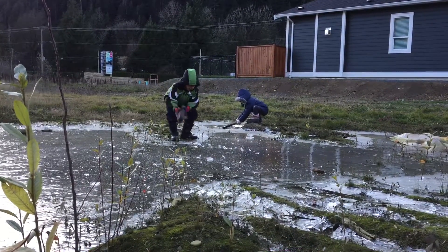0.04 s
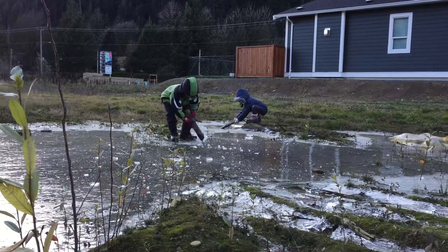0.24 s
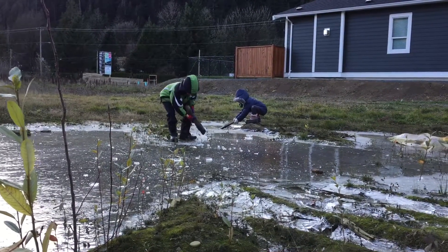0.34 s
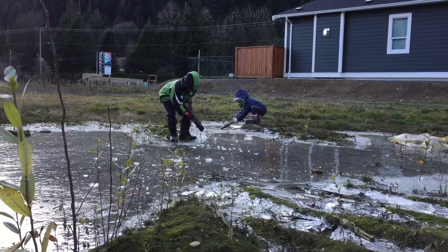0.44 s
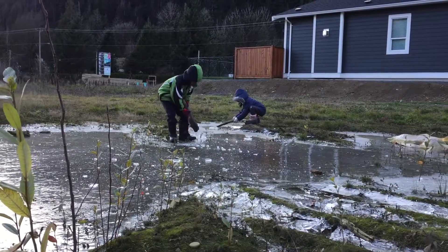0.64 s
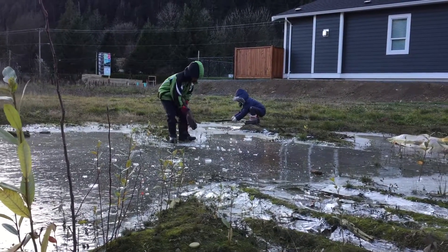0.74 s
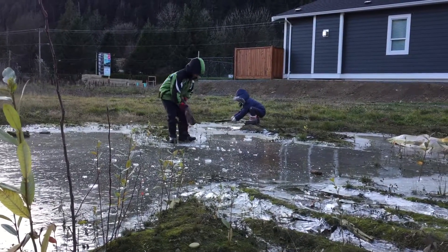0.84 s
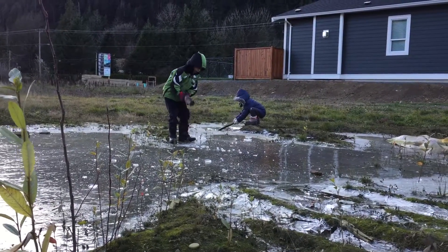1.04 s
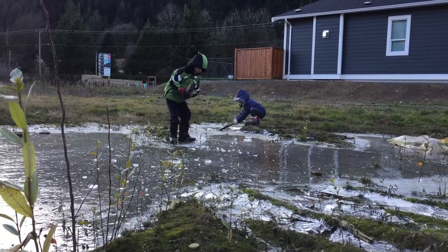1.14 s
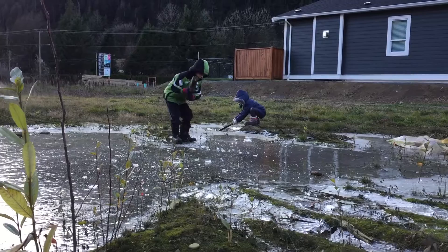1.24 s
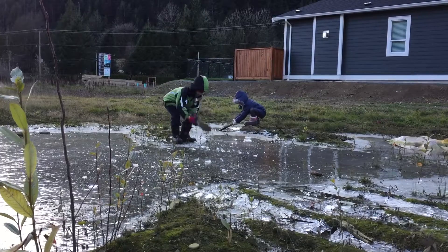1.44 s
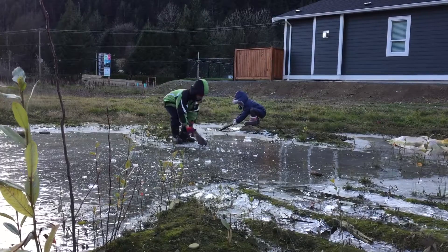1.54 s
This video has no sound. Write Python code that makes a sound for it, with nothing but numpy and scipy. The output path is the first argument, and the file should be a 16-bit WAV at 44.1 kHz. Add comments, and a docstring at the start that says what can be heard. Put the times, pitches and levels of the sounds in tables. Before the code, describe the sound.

A sharp crash of ice on a frozen puddle, then shards skid, clink and crack.

```python
"""A sharp crash of ice some metres away: a child smashes a slab on a frozen puddle in an open field.
The sheet cracks in runs of tiny fractures, rings and slaps the water. Splinters tick and skid,
loose plates clink and smaller cracks follow, with dull echoes from ground, house and trees.
Wind nudges the microphone; a far machine hums under the quiet air."""
import sys
import numpy as np
from scipy import signal
from scipy.fft import rfft, irfft
from scipy.io import wavfile

SR = 44100
rng = np.random.default_rng(int(sys.argv[2]) if len(sys.argv) > 2 else 0)


def unload_wav(signal):
    """Save mono or channel-first audio to the path in sys.argv[1] as 16-bit WAV at rate SR, clipped to [-1, 1]."""
    wavfile.write(
        sys.argv[1],
        SR,
        np.round(np.clip(np.atleast_2d(signal).T, -1, 1) * 32767).astype(np.int16),
    )


N = 70560
T = np.arange(N) / SR
BLOW_S = .2364


def blow(slap_lag_s=.0021):
    """The slab hits the sheet, which rings briefly and slaps the water."""
    # modes of the struck sheet: (frequency [Hz], level [dB], t60 [s])
    sheet_modes = [(1180, -4, .016), (1580, -6, .014), (1878, -7, .022), (2520, -17, .017),
                   (3230, -20, .026), (4460, -26, .026), (8780, -29, .024)]
    # modes of the sheet bending on the water: (frequency [Hz], level [dB], t60 [s])
    slap_modes = [(152, -23, .06), (250, -23, .025), (560, -13.5, .026), (909, -20, .038)]
    sheet = body(click(BLOW_S, db=1.4), sheet_modes)
    slap = body(click(BLOW_S + slap_lag_s, db=1.5), slap_modes)
    return filtered(sheet + slap, 140, "high", order=3)  # a thin sheet radiates little bass


def cracks():
    """Each crack is a brief run of tiny fractures; large pieces thud, small ones snap and splinter."""
    # cracks and crunches: (time [s], rise [s], decay [s], thud [dB], snap [dB], splinter [dB],
    # thud [Hz], snap [Hz], splinter [Hz])
    bursts = [(0.2227, 0.006, 0.0094, -39, -30, -37.5, 1010, 2000, 5150),
              (.2350, 0.0023, .0015, -12.5, -14.5, -19, 1160, 1760, 4800),
              (0.2377, .0005, 0.0025, -24, -19.5, -25.5, 590, 2340, 8800),
              (.2490, 0.0015, 0.0038, -28.5, -54, -35.5, 976, 2000, 4950),
              (0.2923, 0.0025, 0.0034, -42, -66.5, -53.5, 890, 1910, 5740),
              (0.339, 0.0055, 0.0061, -35.5, -37.5, -50, 590, 1420, 7400),
              (0.4244, 0.00076, 0.0017, -38.5, -42, -48, 1100, 1920, 5500),
              (.440, 0.0025, .006, -42.5, -49, -67, 1100, 1640, 4000),
              (0.4579, 0.00082, 0.0025, -45.5, -42, -58, 1100, 1880, 3800),
              (0.544, 0.0011, 0.0038, -58, -43.5, -72, 1100, 1780, 4000),
              (.552, .002, 0.0024, -52, -51.5, -70, 1100, 1850, 3950),
              (.6062, 0.00063, .003, -52.5, -48, -83, 1100, 1820, 4030),
              (.688, 0.0015, 0.0048, -39.5, -43, -58.5, 1200, 2670, 8440),
              (0.7518, 0.0027, 0.0031, -47, -43.5, -48, 1100, 2400, 4070),
              (0.797, 0.0019, 0.0054, -44.5, -41.5, -50, 1220, 1880, 5950),
              (0.8216, 0.00068, 0.0046, -29.5, -27.5, -39, 950, 2530, 6940),
              (.838, 0.0018, 0.0057, -36.5, -39.5, -53, 1250, 2370, 4500),
              (0.9216, .001, 0.0038, -48.5, -54.5, -64.5, 1100, 1900, 6150),
              (1.052, 0.0035, 0.0071, -38, -41, -75, 660, 1970, 4030),
              (1.0753, 0.0012, 0.015, -46.5, -57.5, -60, 1100, 2000, 3990),
              (1.093, 0.0084, 0.0014, -35.5, -34, -39, 472.2, 1600, 6440),
              (1.1149, .002, 0.0066, -54, -52, -62, 1100, 2400, 6240),
              (1.592, 0.0029, .008, -33.5, -28.5, -33.5, 1300, 2550, 5500)]
    out = np.zeros(N)
    for s, rise_s, decay_s, thud_db, snap_db, splinter_db, thud_hz, snap_hz, splinter_hz in bursts:
        envelope = np.clip((T - s) / rise_s, 0, 1) * np.exp(-np.maximum(T - s - rise_s, 0) / decay_s)
        large, medium, small = [envelope * grains(per_s=7100, spread_db=2.5) for _ in range(3)]
        thud = filtered(resonant(large, thud_hz, width=1.45), (180, 2500), "band")
        snap = filtered(resonant(medium, snap_hz, width=1.168), (820, 3800), "band")
        splinter = filtered(resonant(small, splinter_hz, width=1.14), 3100, "high")
        for band, db in ((thud, thud_db), (snap, snap_db), (splinter, splinter_db)):
            out += from_db(db) * match_energy(band, envelope)
    return out


def clinks():
    """Knocked loose plates ring like dull glass."""
    # knocks on a plate: (time [s], level [dB], pitch [ratio])
    knocks = [(0.6888, -35, 0.98), (0.6982, -44, 0.98), (0.7037, -44, 0.98), (0.8042, -42.5, 0.91)]
    # plate modes: (frequency [Hz], level [dB], t60 [s])
    plate_modes = [(1211, -6, .04), (1420, -6, .035), (1990, -6, .035), (2428, -5, .04), (2960, 0, .044),
                   (4540, -7, .034), (8100, -14, .03)]
    out = np.zeros(N)
    for s, db, pitch in knocks:
        for k, (hz, mode_db, t60_s) in enumerate(plate_modes):
            out += (-1) ** k * ring(click(s, db + mode_db), hz * pitch, t60_s)
    return out


def splinter_ticks(contact_s=.00094, scuff_max_hz=10000):
    """Each splinter lands with a brief scuff and its own bright ring."""
    # splinter landings: (time [s], level [dB], ring [Hz])
    landings = [(.2915, -51, 12000), (.3170, -37.5, 6800), (0.32, -54, 11400), (0.3453, -37.5, 15000),
                (0.3634, -41, 10000), (0.3716, -44, 7240), (0.3886, -44.5, 13600), (.453, -56, 9200),
                (0.4994, -54.5, 11000), (0.5142, -47, 7800), (.5224, -42.5, 6740), (.559, -58, 14800),
                (0.8, -51, 15000), (0.8236, -45, 12900), (0.9367, -54, 7000)]
    out = np.zeros(N)
    for s, db, hz in landings:
        contact = (T >= s) * np.exp(-np.abs(T - s) / contact_s)
        scuff = resonant(contact * rng.standard_normal(N), min(hz, scuff_max_hz), width=3.3)
        out += from_db(db) * match_energy(scuff, contact)
        out += ring(click(s, db - 6), hz, t60_s=.012)
    return filtered(out, 2440, "high")


def spray(db=-56, chips_per_s=6000, decay_s=.14):
    """Fine chips and droplets patter down after the blow, fading away."""
    envelope = (T > BLOW_S) * np.exp(-np.abs(T - BLOW_S) / decay_s)
    pitches_hz = np.geomspace(3670, 15000, 16)
    patter = np.zeros(N)
    for hz in pitches_hz:
        impacts = grains(chips_per_s / len(pitches_hz), spread_db=.5)
        patter += resonant(impacts, hz, width=1.1) / np.sqrt(hz)
    return from_db(db) * envelope * rms_one(patter)


def skid(contacts_per_s=2500, band_hz=(780, 6300)):
    """Small pieces rustle and ring faintly as they slide over the sheet."""
    # modes of the sliding pieces: (frequency [Hz], level [dB], t60 [s])
    piece_modes = [(1100, -1.5, 0.015), (1550, -4.5, 0.02), (1876, -0.5, 0.014), (1940, -1, 0.021),
                   (2240, -4.5, 0.014), (3400, -7.5, .005)]
    # skid envelope: (time [s], level [dB])
    levels = [(0, -48.5), (.05, -63.5), (.12, -54), (.2, -67), (.4, -57.5), (.65, -61), (.9, -59.5),
              (1.15, -77), (1.6, -73)]
    chatter = np.zeros(N)
    for hz, db, t60_s in piece_modes:
        contacts = grains(contacts_per_s / len(piece_modes), spread_db=2)
        chatter += from_db(db) * ring(contacts, hz, t60_s)
    envelope = from_db(np.interp(T, *np.transpose(levels)))
    return envelope * rms_one(filtered(chatter, band_hz, "band"))


def scatter(x, db, t60_s, top_hz, onset_s=.004):
    """A dull, dying cloud of reflections."""
    tail = rng.standard_normal(N) * from_db(-60 * T / t60_s) * (1 - np.exp(-T / onset_s))
    echoes = signal.fftconvolve(x, tail / np.linalg.norm(tail))[:N]
    return from_db(db) * filtered(echoes, top_hz, "low", order=1)


def wind(width=1.57):
    """Short low lumps of air pressure on the microphone."""
    # wind buffets: (peak time [s], level [dB], Gaussian sigma [s], band centre [Hz])
    buffets = [(0.52, -47.5, 0.15, 66.7), (0.665, -48.5, 0.041, 97.5), (0.75, -38.5, 0.027, 65),
               (0.863, -47.5, 0.052, 76.6), (0.969, -35.5, 0.011, 55.3), (1.053, -45.5, 0.052, 74.8),
               (1.227, -34.5, 0.0092, 80), (1.43, -37, 0.0072, 135), (1.493, -38, 0.014, 70),
               (1.519, -32.5, 0.012, 134.5), (1.537, -42, 0.041, 75)]
    out = np.zeros(N)
    for s, db, sigma_s, hz in buffets:
        envelope = np.exp(-.5 * ((T - s) / sigma_s) ** 2)
        rumble = filtered(rng.standard_normal(N), (hz / width, hz * width), "band", order=3)
        out += from_db(db) * match_energy(rumble * envelope, envelope)
    return out


def machine_hum(wander_hz=3):
    """Two tones of a far machine waver in level and pitch."""
    # machine tones: (frequency [Hz], level [dB])
    tones = [(242.2, -56.5), (269.5, -51.5)]
    out = np.zeros(N)
    for hz, db in tones:
        waver = 1 + .5 * drift(rate_hz=14)
        phase = 2 * np.pi * np.cumsum(hz + wander_hz * drift(rate_hz=10)) / SR
        out += from_db(db) * rms_one(waver * np.sin(phase))
    return out


def open_air(db=-50.5):
    """Quiet, steady noise, strongest in the low hundreds of Hz."""
    # air spectrum: (frequency [Hz], relative density [dB])
    spectrum = [(20, -17), (60, -5), (150, -2.5), (220, 2), (300, 1.5), (380, -6.5), (600, -14),
                (1500, -21), (2500, -27.5), (5000, -34.5), (9000, -40.5), (16000, -44.5)]
    hz, density_db = np.transpose(spectrum)
    bins_hz = np.fft.rfftfreq(N, 1 / SR)
    colour = from_db(np.interp(np.log(bins_hz + 1), np.log(hz), density_db))
    return from_db(db) * rms_one(irfft(rfft(rng.standard_normal(N)) * colour, N))


def from_db(db):
    """Decibels to gain."""
    return 10 ** (np.asarray(db) / 20)


def rms_one(x):
    """Scale to rms 1."""
    return x / np.sqrt(np.mean(x ** 2) + 1e-20)


def match_energy(x, envelope):
    """Give a burst the energy of its envelope."""
    return rms_one(x) * np.sqrt(np.mean(envelope ** 2))


def filtered(x, hz, kind, order=2):
    """Butterworth filter."""
    sos = signal.butter(order, np.clip(hz, 10, SR * .45), kind, fs=SR, output="sos")
    return signal.sosfilt(sos, x + 1e-18)


def resonant(x, hz, width):
    """Broad resonance; width is the ratio of band edge to centre."""
    return filtered(x, (hz / width, hz * width), "band", order=1)


def drift(rate_hz):
    """Slow random motion, rms 1."""
    return rms_one(filtered(rng.standard_normal(2 * N), rate_hz, "low")[N:])


def click(s, db):
    """One impulse."""
    return from_db(db) * (np.arange(N) == int(s * SR))


def grains(per_s, spread_db):
    """Random clicks of uneven size."""
    sizes = from_db(spread_db * np.minimum(rng.exponential(1, N), 4))
    signs = rng.choice([-1, 1], N)
    return sizes * signs * (rng.random(N) < per_s / SR)


def ring(clicks, hz, t60_s):
    """One mode: a unit click starts a decaying sine of height 1."""
    radius, angle = from_db(-60 / (t60_s * SR)), 2 * np.pi * hz / SR
    return signal.lfilter([0, np.sin(angle)], [1, -2 * radius * np.cos(angle), radius ** 2],
                          clicks + 1e-18)


def body(clicks, modes):
    """All modes of an object, driven by the same clicks."""
    return sum(from_db(db) * ring(clicks, hz, t60_s) for hz, db, t60_s in modes)


def scene():
    """Ice and its echoes over wind, hum and air; mono."""
    ice = blow() + cracks() + clinks() + splinter_ticks() + spray()
    near = scatter(ice, db=-17, t60_s=.084, top_hz=3000)  # ground
    far = scatter(ice, db=-28.5, t60_s=.7, top_hz=2500)  # house and trees
    return (ice + near + far + skid() + wind() + open_air() + machine_hum())[None]


def record(dry, cutoff_hz=15900):
    """Clip at full scale, then cut the top steeply."""
    lowpass = signal.ellip(10, .1, 80, cutoff_hz, fs=SR, output="sos")
    return signal.sosfilt(lowpass, np.clip(dry, -1, 1))


dry = scene()
out = record(dry)
unload_wav(out)
```